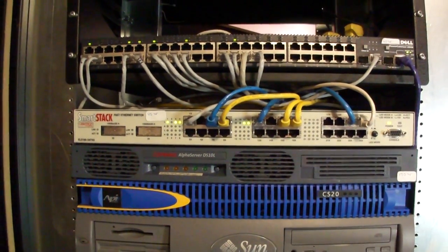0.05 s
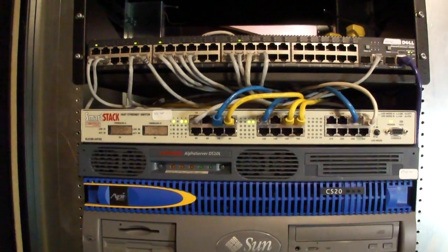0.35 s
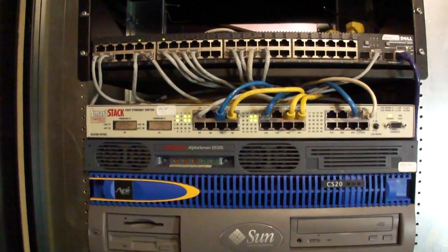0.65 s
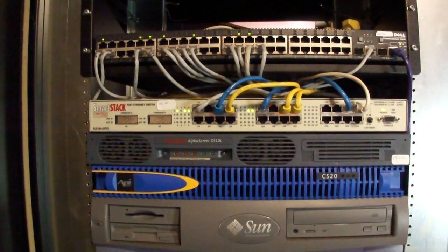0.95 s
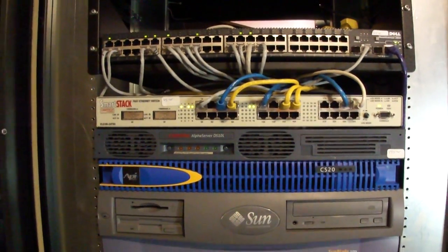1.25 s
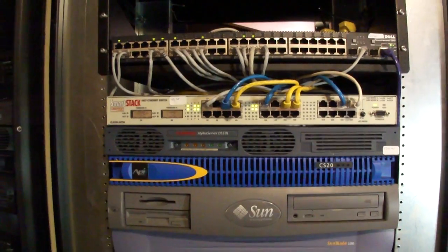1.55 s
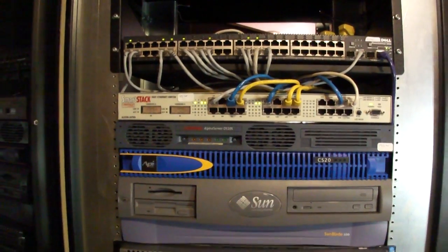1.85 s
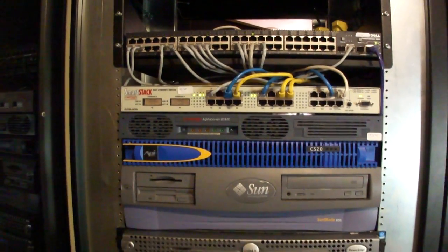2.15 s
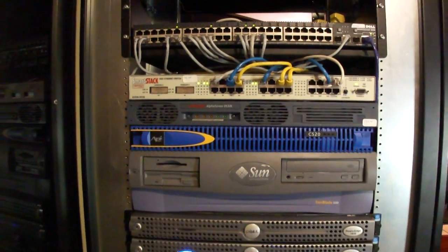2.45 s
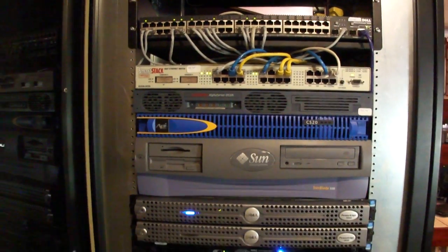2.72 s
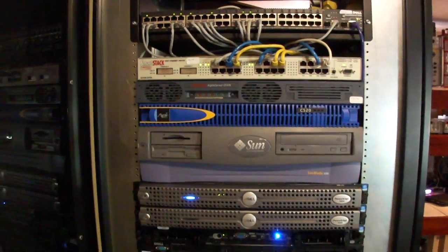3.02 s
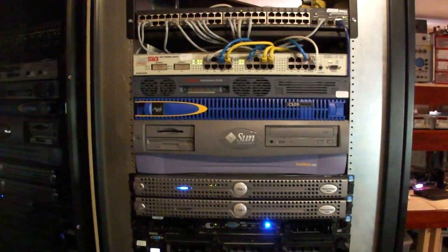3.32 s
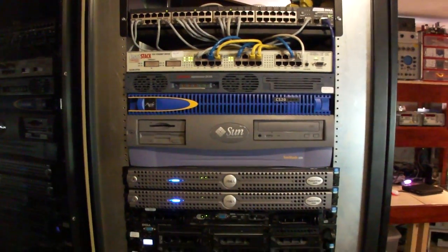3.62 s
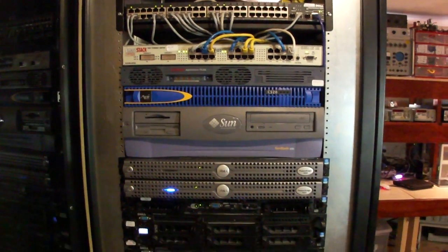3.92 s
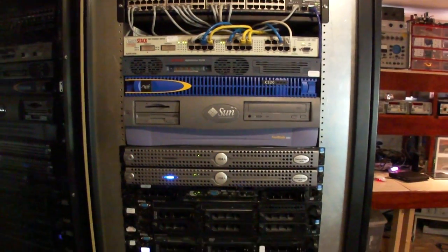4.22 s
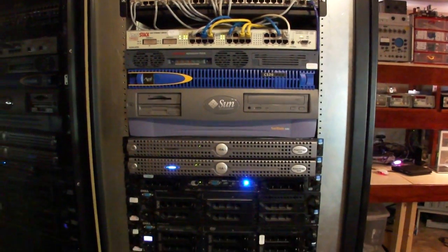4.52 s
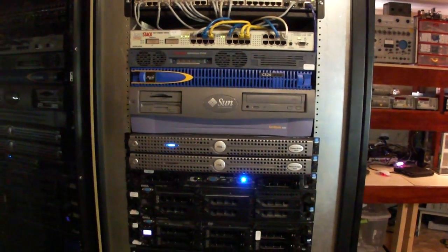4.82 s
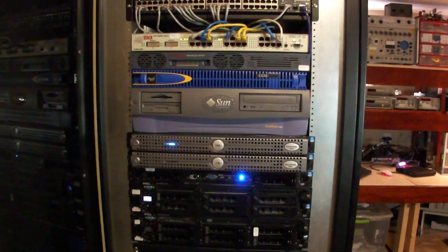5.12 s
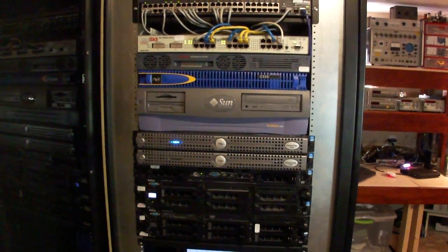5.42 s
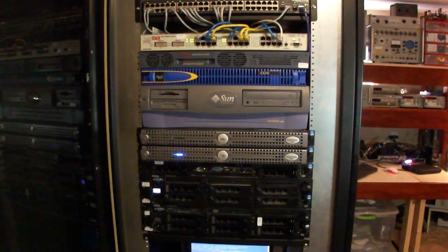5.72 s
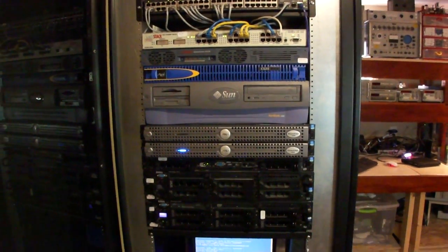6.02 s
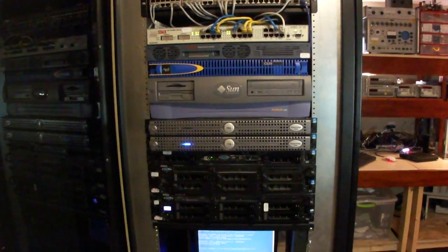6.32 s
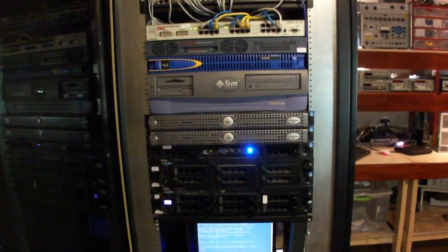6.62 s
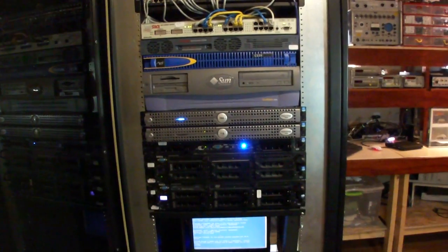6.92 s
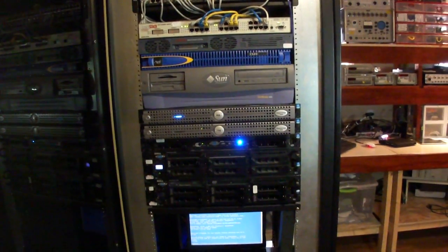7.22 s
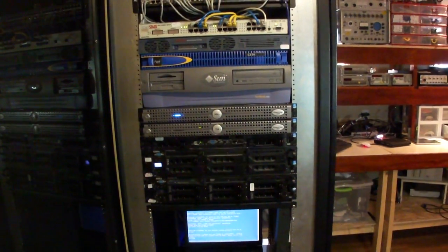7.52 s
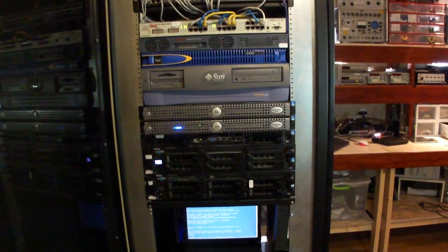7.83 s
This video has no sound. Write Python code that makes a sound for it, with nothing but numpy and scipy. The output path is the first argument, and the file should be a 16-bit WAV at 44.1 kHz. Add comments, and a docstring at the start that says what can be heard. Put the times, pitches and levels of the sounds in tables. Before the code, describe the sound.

A loud, steady roar of cooling fans from a rack of servers and network switches fills a workshop from start to finish, about eight seconds. It is a slightly hollow rush of air with a low hum beneath and a light hiss above. A mid-pitched, gently fluttering fan tone grows from about 2 seconds, drops very slightly in pitch around 3 seconds and is strongest just after 4. It fades by about 7 seconds, returning to its first pitch. Lower fan hums swell and fall away around 2 to 3 seconds and again from 6 to 7.5. Thin, high disk drive whines waver throughout and wander between left and right, standing out briefly near 2, 4.5 and 7 seconds. The microphone slowly backs away, so the hum and rush soften a little while the main roar holds.

```python
"""A steady roar of air, laced with fan tones and thin whines: a rack of servers and switches in a workshop.
Air rushes through the cases and hisses at the grilles; fan blades hum and disk drive spindles whine.
A loud fan tone swells and fades; a slightly lower tone takes over midway, then the higher returns.
The other tones fade in and out in the room's standing waves as the microphone slowly backs away."""
import sys
import numpy as np
from scipy import signal
from scipy.fft import rfft, irfft
from scipy.io import wavfile

SR = 44100
rng = np.random.default_rng(int(sys.argv[2]) if len(sys.argv) > 2 else 0)


def unload_audio(sound):
    """Save the sound as a 16-bit wav file, at the path given as the first command line argument."""
    columns = np.transpose(np.atleast_2d(sound))
    # keep every value between -1 and 1, then stretch to whole-number steps
    steps = np.round(np.clip(columns, -1, 1) * 32767)
    wavfile.write(sys.argv[1], SR, steps.astype(np.int16))


N = 346626
TIME = np.arange(N) / SR
FREQS = np.maximum(np.arange(N // 2 + 1) * SR / N, 1)

# stereo balance across the spectrum: (frequency [Hz], left over right [dB])
BALANCE = [(60, -1), (110, 0), (200, 1.5), (380, 1.5), (700, 1.5), (1290, 2.0), (2380, 2.5), (4400, 1.0),
           (8120, 1.5), (15000, 2.0)]


def airflow(roar_db=0.5, rush_db=0.77, hum_db=2.5):
    """Air churns through cases and grilles: roar, rush and hum sink with distance, the hiss holds."""
    # five bands of air noise, low to high: (frequency [Hz], density before shaping [dB per Hz])
    hum_band = [(20, -111), (60, -107), (90, -100), (110, -80), (130, -82.5), (180, -86.5)]
    rumble_band = [(90, -105), (120, -88.5), (160, -81.5), (200, -76.5), (280, -82.5), (500, -86)]
    roar_band = [(140, -105), (220, -75), (290, -66.5), (380, -66.5), (520, -65.5), (660, -59.5),
                 (820, -60), (1060, -59.5), (1400, -66.5), (2200, -86)]
    rush_band = [(700, -95), (1300, -65), (1850, -61.5), (2150, -66), (2500, -72.5), (2900, -82.5),
                 (4000, -97.5)]
    hiss_band = [(2000, -96.5), (3400, -81), (4500, -85.5), (6200, -80), (7500, -84.5), (9000, -88),
                 (10300, -90.5), (12000, -108), (15500, -100)]
    # the case rumble dips at a node along the microphone's path: (time [s], gain [dB])
    rumble_fader = [(0.5, 5), (3.3, 0.5), (4.3, -5.5), (5.5, -4), (7.0, -0.5)]
    roar_fall_db_per_s, rush_fall_db_per_s, hum_fall_db_per_s = 0.06, 0.2343, 0.65
    rumble = from_db(at_times(rumble_fader)) * air_noise(rumble_band)
    roar = from_db(roar_db - roar_fall_db_per_s * TIME) * air_noise(roar_band)
    rush = from_db(rush_db - rush_fall_db_per_s * TIME) * air_noise(rush_band)
    hum = from_db(hum_db - hum_fall_db_per_s * TIME) * air_noise(hum_band)
    return rumble + roar + rush + hum + air_noise(hiss_band)


def loud_fan_tone(swell_db=-28.5, floor_db=-40.5, steepness=2.2, flutter_db=1.05, jitter_hz=0.35):
    """Blades passing struts make a strong tone that swells and fades; uneven inflow makes it flutter."""
    # a slightly lower tone takes over midway, then the higher returns: (time [s], pitch [Hz])
    blade_pitch = [(0, 825.6), (2.8, 826.0), (3.45, 821.8), (6.3, 822.7), (7.1, 825.5)]
    peak_s, half_width_s = 4.27, 2.32
    hz = at_times(blade_pitch) + jitter_hz * drift(8.4)
    phase = 2 * np.pi * np.cumsum(hz) / SR
    from_peak = np.abs((TIME - peak_s) / half_width_s)
    swell = from_db(swell_db) * .5 ** (from_peak ** steepness)
    gain = np.hypot(swell, from_db(floor_db)) * from_db(flutter_db * drift(12))
    return np.sqrt(2) * np.sin(phase) * gain * pan(lean_db=1.5)


def standing_wave_swells(waver_db=0.9, waver_hz=6, steepness=6):
    """A tone rises, wavers and falls away as the microphone crosses a lobe of its standing wave."""
    # fans and drives that stand out in places: (source, pitch [Hz])
    hz = {"fan A": 406.5, "fan B": 455.5, "fan C": 571, "fan D": 622, "fan E": 813, "main drive": 6113,
          "whine A": 4464, "whine B": 5338, "whine C": 6019, "whine D": 6888, "whine E": 7958, "whine F":
          8831, "whine G": 9508}
    # lobes along the path: (centre [s], source, length [s], level [dB], left over right [dB])
    lobes = [(0.5, "fan E", 1.2, -42, -1), (0.7, "main drive", 1.1, -63, 8),
             (0.802, "fan A", 2.4, -44.5, -2), (1.854, "main drive", 0.47, -50.5, -2),
             (2.05, "fan B", 1.45, -40.5, 2.5), (2.55, "whine A", 0.4, -63, 0),
             (2.7, "whine D", 0.4, -58, -2), (2.75, "main drive", 0.93, -56.5, -9),
             (3.0, "fan C", 1.4, -44, 3), (3.25, "whine D", 0.3, -57, 8), (3.9, "fan D", 0.9, -44, 2),
             (4.08, "main drive", 0.26, -53, -4), (4.55, "main drive", 0.53, -53.5, -4),
             (4.62, "whine C", 0.3, -55, -4), (5.85, "main drive", 0.8, -54.5, -9),
             (6.1, "fan A", 4.1, -47, -2), (6.3, "fan B", 2.3, -44.5, 3), (6.45, "whine E", 0.54, -62, 7),
             (6.5, "whine B", 1.2, -58, -1), (6.65, "whine G", 0.8, -67, 4), (6.2, "fan C", 1.2, -46, -1),
             (7.35, "fan C", 0.66, -40, 1), (7.05, "main drive", 0.63, -51.5, 1),
             (7.6, "main drive", 0.4, -52, -3), (7.65, "whine F", 0.5, -64, 0)]
    mix = 0
    for centre_s, source, length_s, db, lean_db in lobes:
        envelope = 1 / (1 + (2 * (TIME - centre_s) / length_s) ** steepness)
        tone = np.sqrt(2) * np.sin(2 * np.pi * (hz[source] * TIME + rng.random()))
        gain = from_db(db + waver_db * drift(waver_hz))
        mix = mix + tone * envelope * gain * pan(lean_db)
    return mix


def far_fans():
    """A bed of blade tones from many farther fans, each wavering on its own."""
    # blade tones and their overtones: (pitch [Hz], level [dB])
    blade_tones = [(113, -70), (167, -70), (310, -52), (340, -51), (483, -47), (497, -49), (548, -52),
                   (622, -54), (633, -51), (1110, -49), (1219, -53), (1388, -52), (1509, -56), (1715, -54),
                   (1768, -54), (1836, -51), (1930, -57), (1997, -53), (2032, -55), (2176, -55),
                   (2497, -61)]
    return sum(from_db(db) * room_tone(hz, direct_share=0.68, fade_hz=1.9) for hz, db in blade_tones)


def disk_drives():
    """Spindles hold their speed; their thin whines arrive mostly reflected and wander between the ears."""
    # whines of spindle motors and bearings: (pitch [Hz], level [dB])
    whines = [(4464, -69), (5338, -64), (5893, -65), (6019, -64), (6113, -63), (6144, -67), (6274, -67),
              (6888, -67), (6986, -69), (7084, -66), (7761, -70), (7958, -70), (8635, -73), (8733, -73),
              (8831, -70), (9508, -75), (9703, -76), (14746, -86), (14944, -83), (15621, -82)]
    return sum(from_db(db) * room_tone(hz, direct_share=0.11, fade_hz=0.92) for hz, db in whines)


def air_noise(band):
    """One band of stereo turbulence, coloured by the hollow cases."""
    # air resonances of the cases: (frequency [Hz], width [Hz], boost [dB])
    case_resonances = [(314.4, 18, 5), (330, 26, 4.5), (476, 127, 5.5), (640, 35, 2)]
    density_db = at_hz(band, FREQS)
    for hz, width_hz, boost_db in case_resonances:
        density_db = density_db + boost_db / (1 + (2 * (FREQS - hz) / width_hz) ** 2)
    high_cut = 1 / (1 + (FREQS / band[-1][0] / 1.2) ** 8)
    low_cut = 1 / (1 + (band[0][0] / FREQS / 1.2) ** 8)
    mid, side = rfft(rng.standard_normal((2, N))) * np.sqrt(SR / 2)
    return irfft(stereo_pickup(mid, side, FREQS) * from_db(density_db) * high_cut * low_cut, N)


def room_tone(hz, direct_share, fade_hz):
    """A steady tone plus room reflections whose sum shifts as the microphone moves."""
    phase = 2 * np.pi * (hz * TIME + rng.random())
    sine, cosine = np.sin(phase), np.cos(phase)
    mid, side = (drift(fade_hz) * sine + drift(fade_hz) * cosine for _ in range(2))
    direct = np.sqrt(2 * direct_share) * sine * pan(at_hz(BALANCE, hz))
    reflected = np.sqrt(1 - direct_share) * stereo_pickup(mid, side, hz)
    return direct + reflected


def stereo_pickup(mid, side, hz):
    """Long waves reach both microphone ports alike; short ones differ, so the treble sounds wide."""
    # likeness of the two ports: (frequency [Hz], left-right correlation [0-1])
    port_likeness = [(40, .75), (120, 0.86), (300, 0.98), (650, 0.95), (1100, 0.87), (2000, 0.77),
                     (3400, .6), (6500, 0.29), (15000, .15)]
    alike = at_hz(port_likeness, hz)
    pair = np.sqrt((1 + alike) / 2) * mid + np.sqrt((1 - alike) / 2) * side * np.array([[1], [-1]])
    return pair * pan(at_hz(BALANCE, hz))


def pan(lean_db):
    """Constant-power left and right gains; a positive lean favours the left."""
    gains = from_db(np.array([[.5], [-.5]]) * lean_db)
    return gains / np.sqrt(np.mean(gains ** 2, axis=0))


def drift(rate_hz, hop=100):
    """Slow random modulation of rms 1, rolling off above rate_hz."""
    pole = np.exp(-2 * np.pi * rate_hz * hop / SR)
    noise = rng.standard_normal(N // hop + 2002)
    slow = signal.lfilter([1], [1, -2 * pole, pole * pole], noise)[2000:]   # skip the filter's run-in
    return np.interp(np.arange(N) / hop, np.arange(len(slow)), slow / np.sqrt(np.mean(slow ** 2)))


def from_db(db):
    """Decibels to gain."""
    return 10 ** (np.asarray(db) / 20)


def at_times(points):
    """Read an automation curve at every sample."""
    return np.interp(TIME, *np.transpose(points))


def at_hz(points, hz):
    """Read a curve on a log-frequency axis."""
    known_hz, values = np.transpose(points)
    return np.interp(np.log(hz), np.log(known_hz), values)


def scene():
    """Everything in the rack runs at once."""
    return airflow() + loud_fan_tone() + far_fans() + disk_drives() + standing_wave_swells()


def record(dry, cutoff_hz=15750):
    """The camera notches a few bands out of the treble and cuts the very top."""
    # notch filters: (centre [Hz], width [Hz])
    notches = [(3005, 755), (4005, 1220), (5005, 1100), (12050, 2000), (13450, 3200)]
    for hz, width_hz in notches:
        dry = signal.lfilter(*signal.iirnotch(hz, hz / width_hz, fs=SR), dry)
    return signal.sosfilt(signal.ellip(12, .1, 80, cutoff_hz, fs=SR, output="sos"), dry)


dry = scene()
out = record(dry)
unload_audio(out)
```